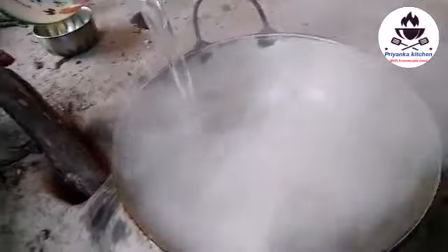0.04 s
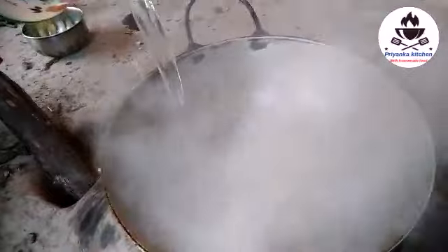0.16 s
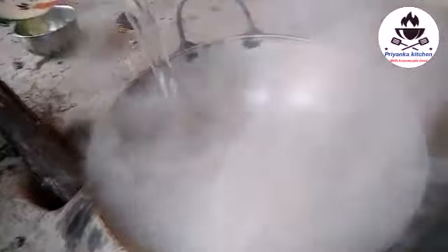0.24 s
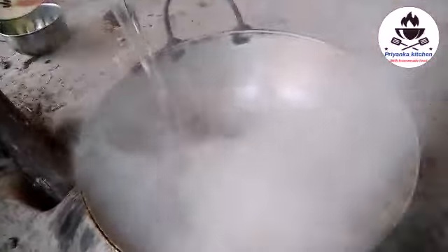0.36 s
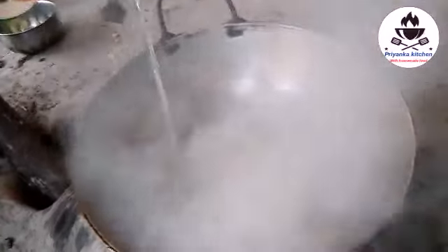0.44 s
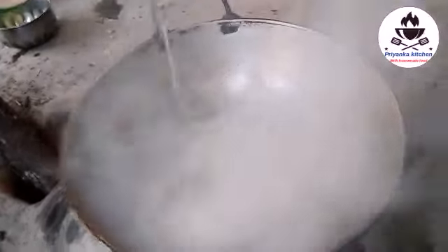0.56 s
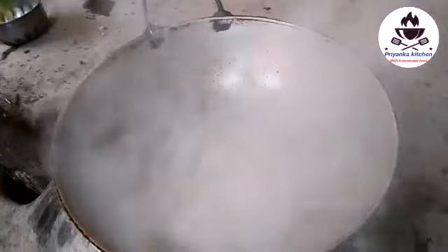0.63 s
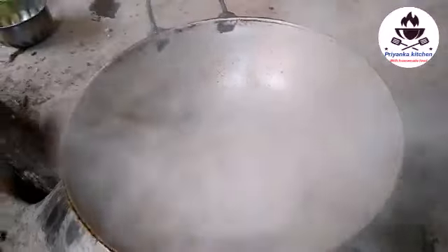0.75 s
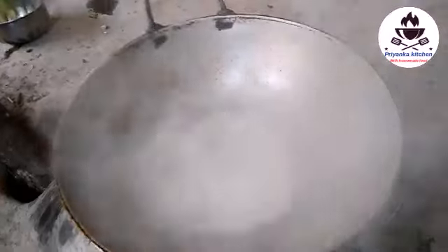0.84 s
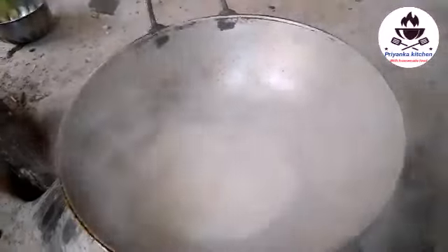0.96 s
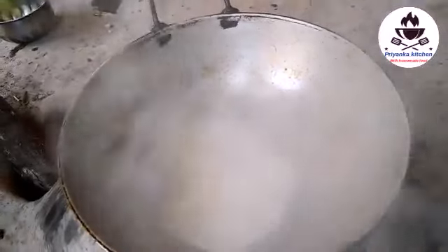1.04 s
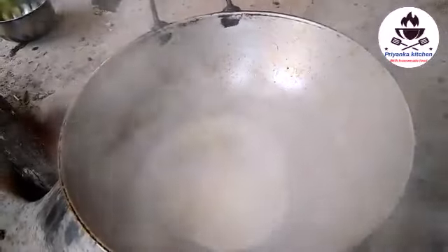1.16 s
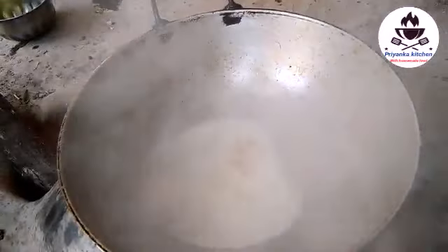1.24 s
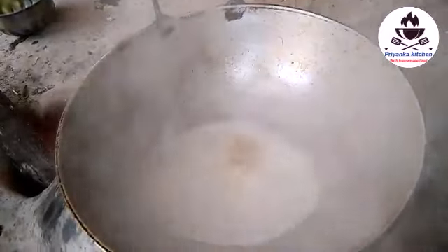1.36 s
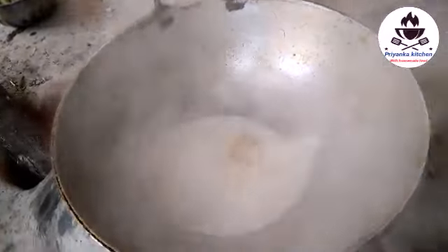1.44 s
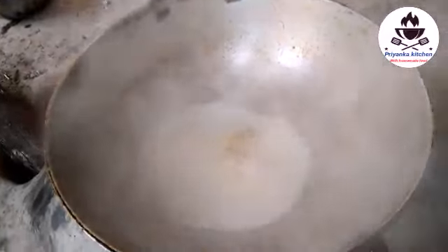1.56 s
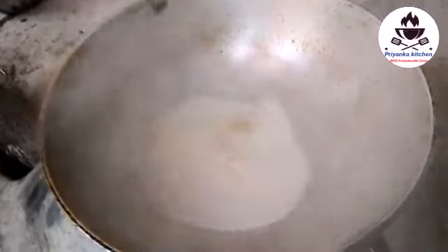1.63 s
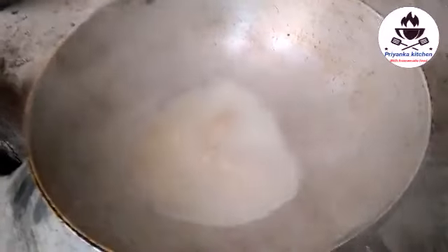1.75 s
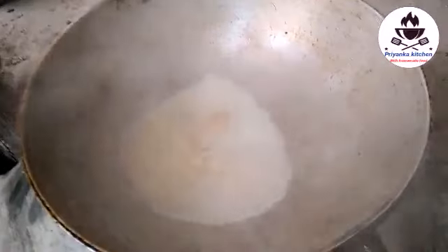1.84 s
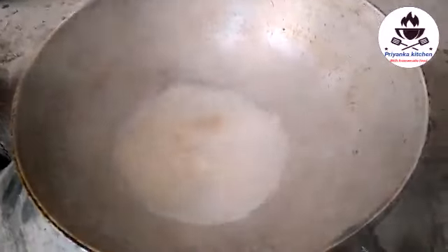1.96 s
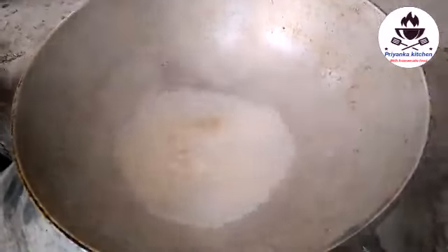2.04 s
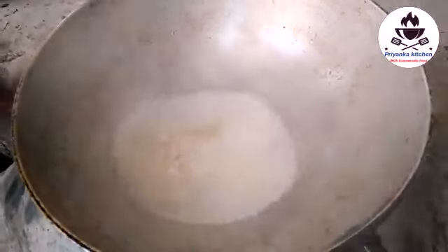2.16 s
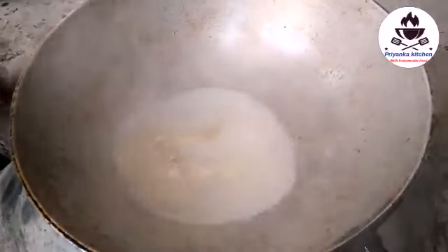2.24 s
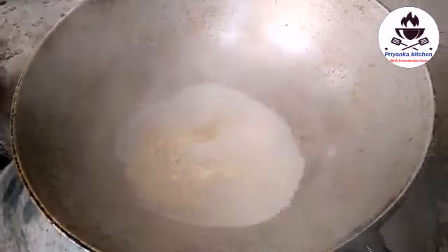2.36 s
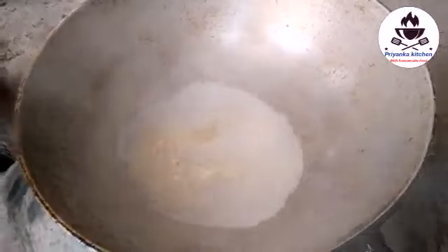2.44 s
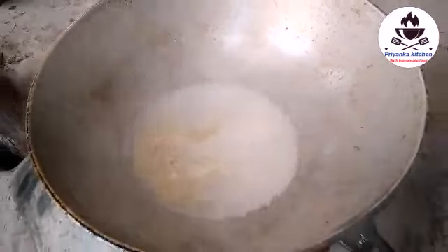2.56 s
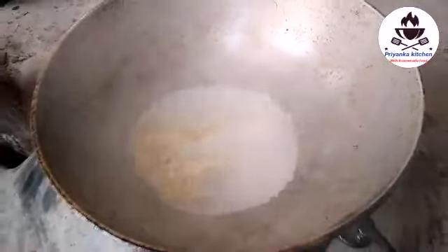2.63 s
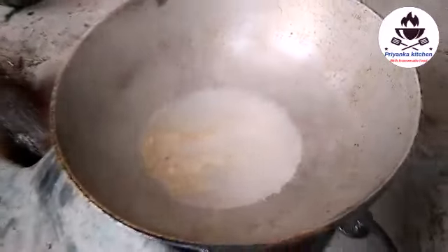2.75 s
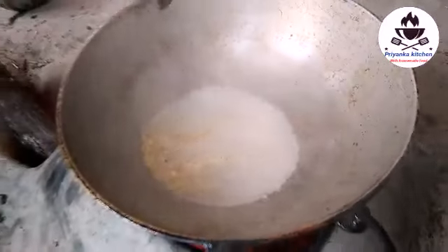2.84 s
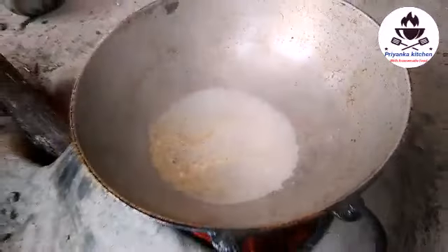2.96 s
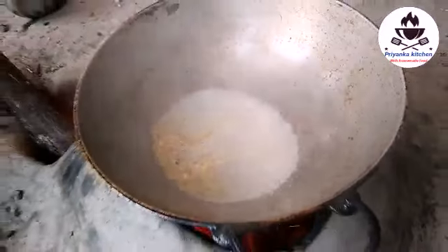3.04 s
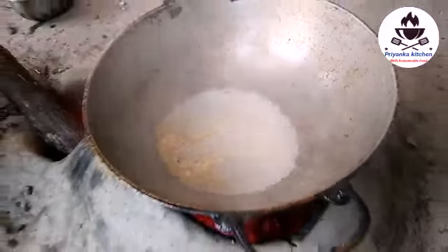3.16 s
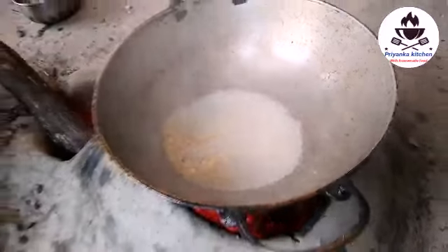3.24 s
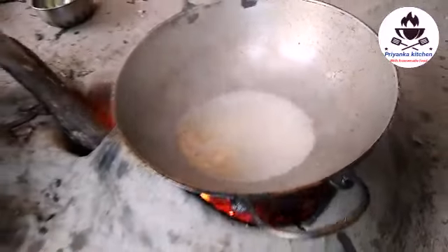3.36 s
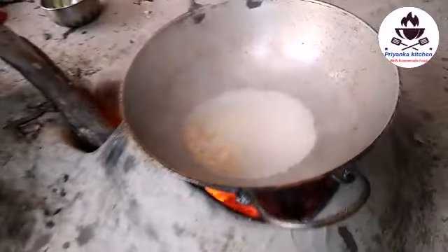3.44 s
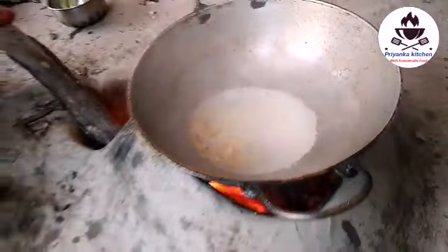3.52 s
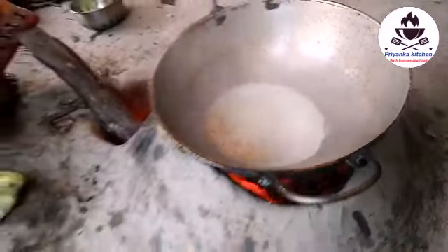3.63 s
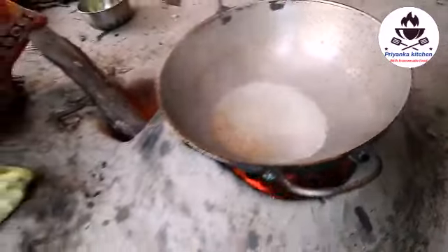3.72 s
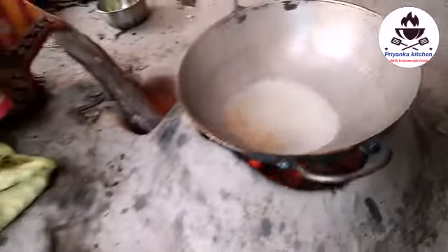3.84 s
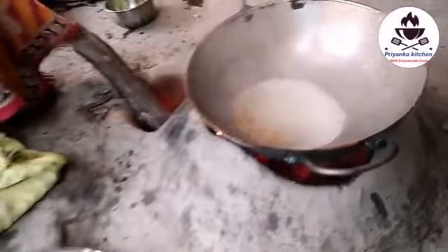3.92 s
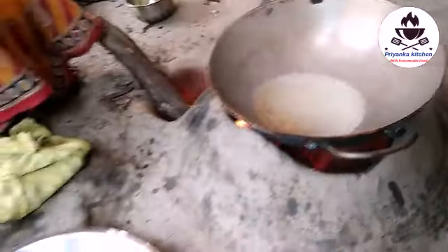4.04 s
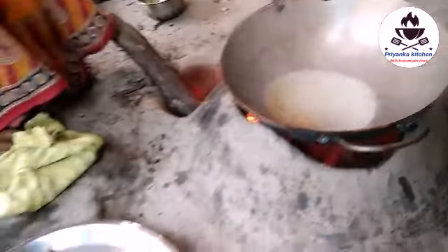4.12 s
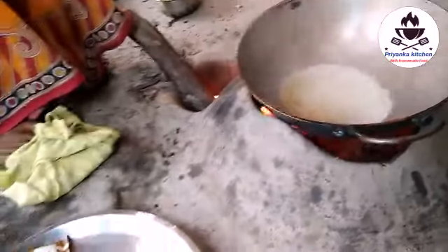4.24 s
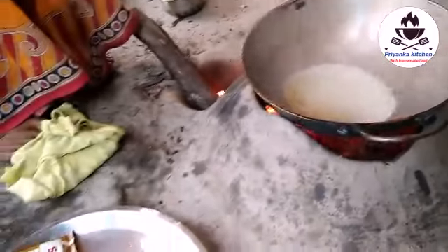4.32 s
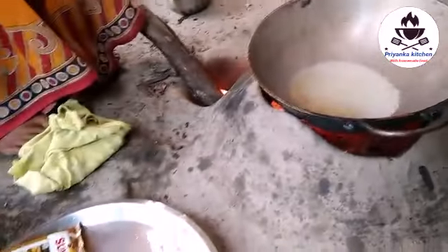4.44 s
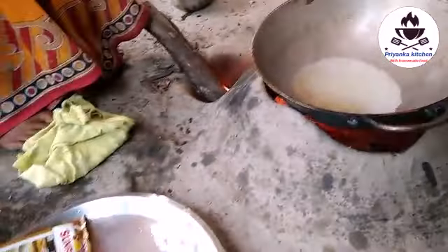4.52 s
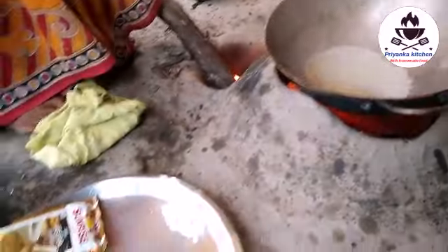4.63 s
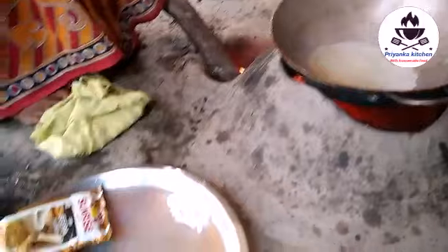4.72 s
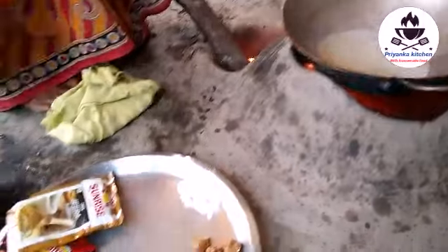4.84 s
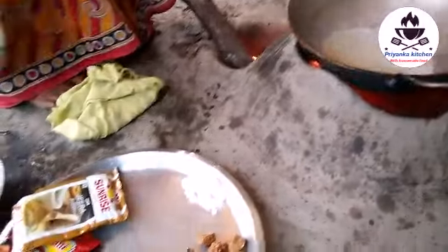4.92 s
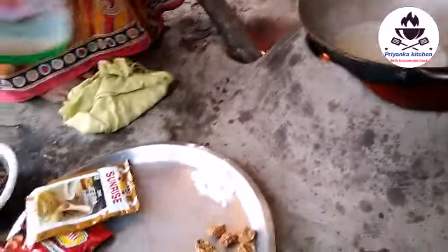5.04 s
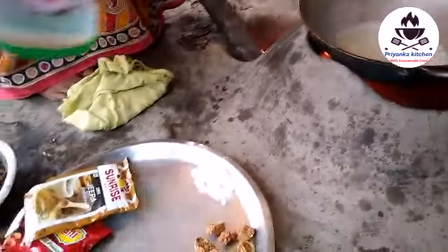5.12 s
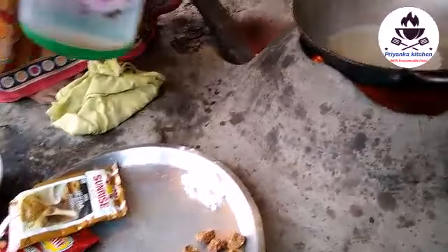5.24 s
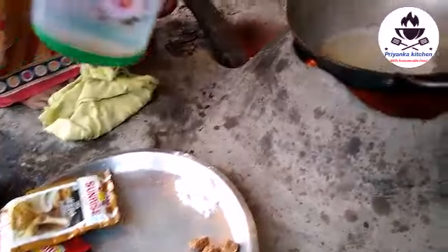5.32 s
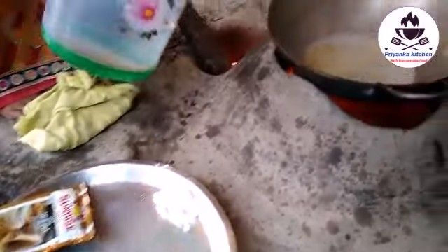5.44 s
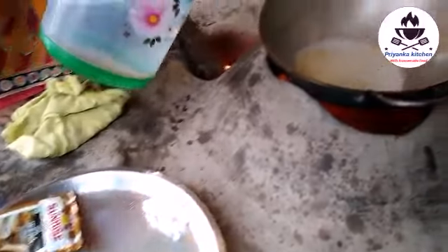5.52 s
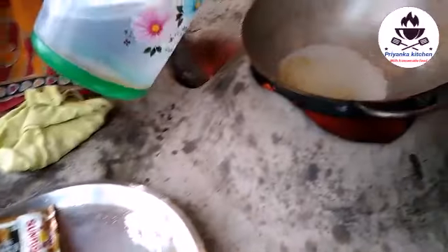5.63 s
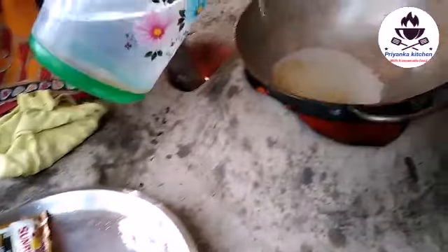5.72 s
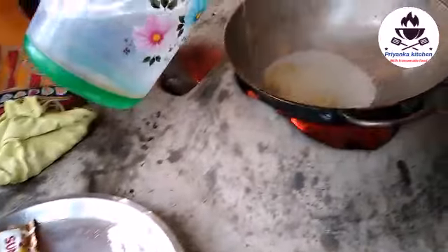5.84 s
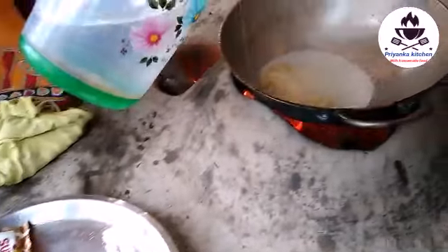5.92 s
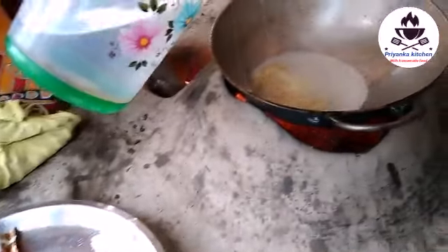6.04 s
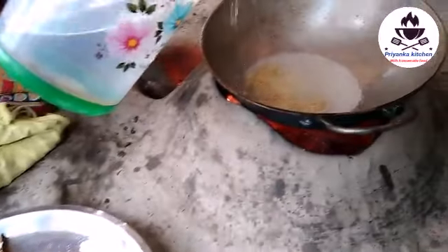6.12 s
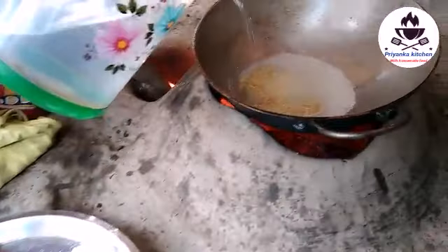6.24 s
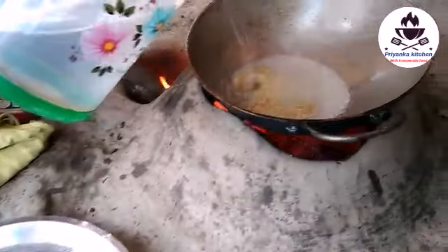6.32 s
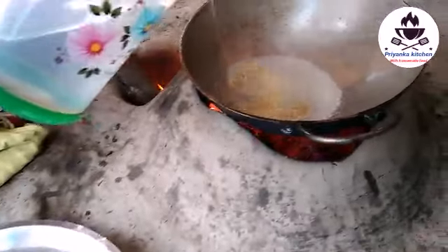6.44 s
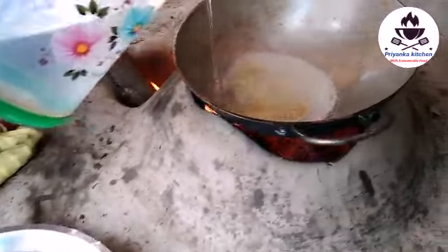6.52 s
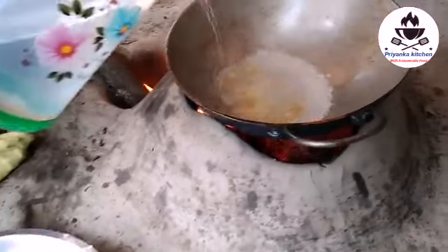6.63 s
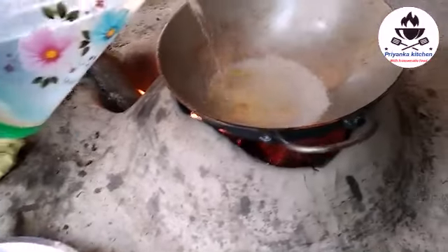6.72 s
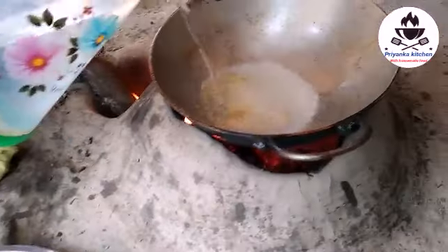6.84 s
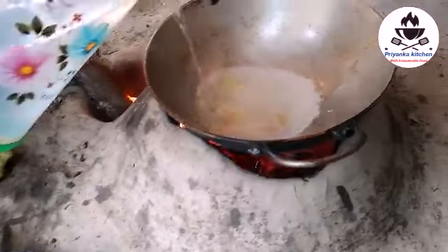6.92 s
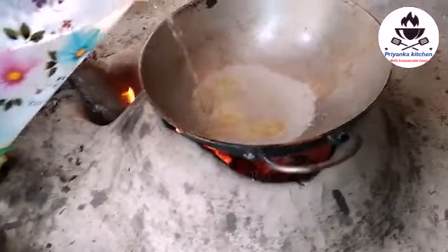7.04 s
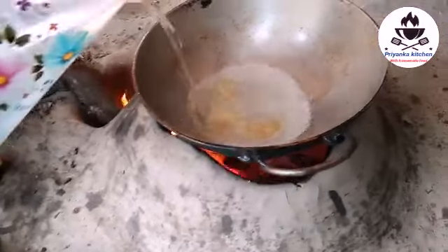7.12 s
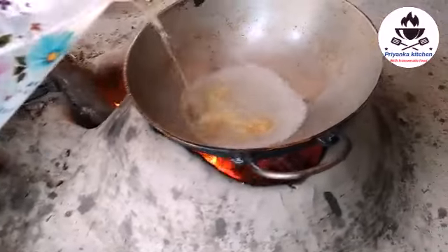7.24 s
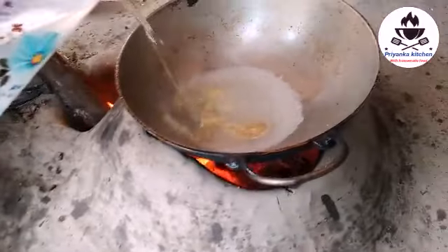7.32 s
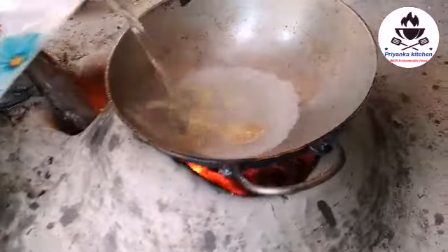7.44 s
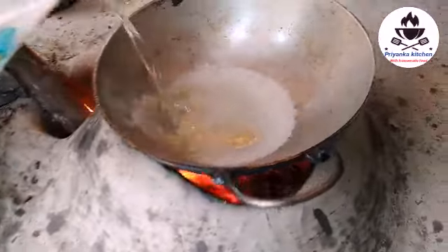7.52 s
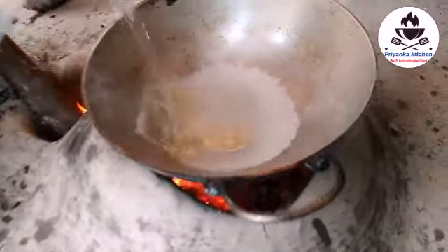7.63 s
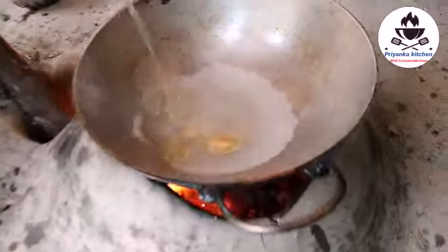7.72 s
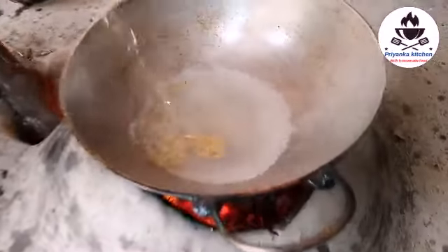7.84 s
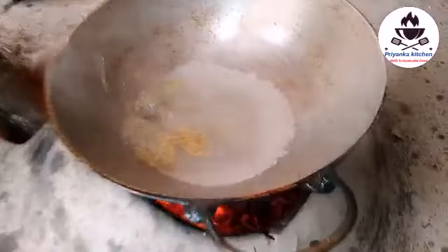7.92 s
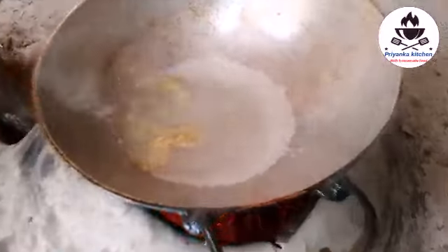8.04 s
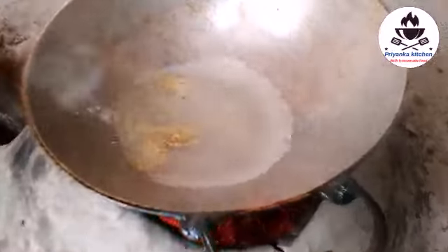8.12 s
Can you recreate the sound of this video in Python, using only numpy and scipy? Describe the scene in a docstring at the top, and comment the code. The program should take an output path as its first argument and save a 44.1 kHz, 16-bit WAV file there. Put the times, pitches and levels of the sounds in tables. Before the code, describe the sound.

Close over a hot oily wok on a wood-fired clay stove, water flashes into a loud, bright steam hiss with frying crackle and sharp oil snaps. The hiss recedes as the hand-held stereo microphone drifts aside, leaving soft boiling, low flutter and small gurgles. Near six seconds a second pour spits in uneven flares and the sizzle swells again.

```python
"""Close over a hot, oily wok on a wood-fired clay stove: the first pour of water flashes into steam at once.
Random bursts over noise make the steam, the frying oil and the boiling bowl; spits of oil snap above them.
A low murmur of throbs soon flutters below, then dull thumps, and decaying tones gurgle once a pool has formed.
The hand-held microphone pair drifts aside and the sound settles; it comes back as a second pour flares up.
A faint rumble lies under it all; the right port loses its bass."""
import sys
import numpy as np
from scipy import signal
from scipy.fft import rfft, irfft, next_fast_len
from scipy.io import wavfile
from scipy.ndimage import uniform_filter1d, map_coordinates

SR = 44100
rng = np.random.default_rng(int(sys.argv[2]) if len(sys.argv) > 2 else 0)


def persist_wave(psi):
    """Save psi, clipped to +-1, as 16-bit WAV."""
    counts = np.round(np.clip(psi, -1, 1) * 32767).astype(np.int16)
    wavfile.write(sys.argv[1], SR, np.atleast_2d(counts).T)


N = 360066  # length in samples


def amp(db):
    """Decibels to gain."""
    return 10 ** (np.asarray(db) / 20)


def unit(x):
    """Scale to rms 1."""
    return x / np.sqrt(np.mean(x ** 2) + 1e-20)


def along(points, hz):
    """Read (f/Hz, value) points on a log frequency axis."""
    f, v = np.transpose(points)
    return np.interp(np.log(hz + 1), np.log(f + 1), v)


def curves(rows):
    """One value per sample for each column after the time."""
    s, *cols = np.transpose(rows)
    return [np.interp(np.arange(N) / SR, s, c) for c in cols]


def wobble(rate):
    """A smooth random curve, rate knots a second."""
    knots = rng.standard_normal(int(N * rate / SR) + 4)
    return map_coordinates(knots, [np.arange(N) * rate / SR])


def filtered(x, response):
    """x times a complex response of frequency."""
    m = next_fast_len(N + SR // 2)
    return irfft(rfft(x, m) * response(np.fft.rfftfreq(m, 1 / SR)), m)[..., :N]


def swept(x, gain_db):
    """Apply a gain that moves: gain_db(column of Hz, sample index of each frame)."""
    hz, at, z = signal.stft(x, SR, nperseg=2048, noverlap=1536)
    frames = np.minimum((at * SR).astype(int), N - 1)
    moved = z * amp(gain_db(hz[:, None], frames))
    return signal.istft(moved, SR, nperseg=2048, noverlap=1536)[1][:, :N]


def bursts(rate, spread_db, share):
    """Two trains of tiny vapour bursts of uneven size, over the blur of those too small to tell apart."""
    pops = (rng.random((2, N)) < rate / SR) * rng.choice([-1, 1], (2, N))
    sizes = amp(spread_db * np.minimum(rng.exponential(size=(2, N)), 4))
    blur = rng.standard_normal((2, N))
    share = np.clip(share, 0, 1)  # the bursts' part of the power
    return np.sqrt(share) * unit(pops * sizes) + np.sqrt(1 - share) * blur


def patchy(x, depth_db, size):
    """Uneven random gains over pitch and time; depth is a number or a curve; size = (bins, frames)."""
    _, at, z = signal.stft(x, nperseg=1024)
    field = uniform_filter1d(rng.standard_normal(z.shape[1:]), size[0], 0)
    field = unit(uniform_filter1d(field, size[1], 1))
    depth = np.interp(at, np.arange(N), depth_db * np.ones(N))
    # the gain can fall far more than it can rise
    gain = amp(depth * (field - 0.95 * field ** 2))
    gain = gain / np.sqrt(np.mean(gain ** 2, axis=0))
    return signal.istft(z * gain, nperseg=1024)[1][:, :N]


# how alike the two microphone ports hear: f/Hz, likeness/0-1
PORT_LIKENESS = [(300, 0.5), (480, 0.65), (680, 0.56), (1200, 0.77), (1800, 0.26), (4000, 0.35),
                 (6000, 0.22), (6900, 0.6), (9000, 0.42), (14000, 0.14)]
# how far the left port lags the right: f/Hz, phase/rad
LEFT_LAG = [(400, .2), (700, .6), (1000, 1.3), (1450, 3.1), (2200, 6.3), (3000, 9.4), (4000, 12.6),
            (4900, 15.7), (5900, 6 * np.pi)]


def at_ports(pair, spectrum, lag=1):
    """Colour two unrelated signals and blend them into a partly alike left and right, with a mid of rms 1."""
    def blend(hz):
        turn = np.arccos(np.clip(along(PORT_LIKENESS, hz), 0, 1)) / 2
        return amp(along(spectrum, hz)) * np.array([np.cos(turn), np.sin(turn)])

    mid, side = filtered(pair, blend)
    ports = np.array([mid + side, mid - side])
    ports = filtered(ports, lambda hz: np.exp(-1j * np.outer([lag, 0], along(LEFT_LAG, hz))))
    return ports / np.std(ports.mean(axis=0))


def panned(x, left_db):
    """Tip a pair towards the left."""
    return np.array([x[0] * amp(left_db / 2), x[1] * amp(-left_db / 2)])


# the microphone's path: t/s, nearness/0-1 (1 above the bowl, 0 far beside it)
MIC_PATH = [(0, 0.98), (2.55, 0.88), (3.5, 0.5), (4.3, 0.19), (5.0, 0.021), (5.9, 0.039), (7.0, 0.26),
            (7.45, 0.28), (8.16, 0.67)]


def nearness():
    """How near the microphone is held to the bowl, sample by sample."""
    return curves(MIC_PATH)[0]


# where the wok lies from the microphone: t/s, left-right level/dB
WOK_BEARING = [(.1, 0), (.8, -1), (2.9, -0.5), (4.0, 0.3), (5.3, 2), (6.9, 1), (7.6, 0), (8.16, -0.5)]
BODY_LEFT_DB = -0.65  # frying and boiling lie a little to the right of the steam


def bearing_db():
    """Left-right level of the wok, sample by sample."""
    return curves(WOK_BEARING)[0]


# colour of the steam: f/Hz, density level/dB per Hz
STEAM_COLOUR = [(3000, -80), (4000, -50), (4950, -13), (5300, -10), (6600, -5), (7800, -1.5), (9000, 2.5),
                (10000, -1), (11200, -3.5), (12500, -3.5), (14300, -8.5)]
HISS_DB, HISS_FAR_LOSS_DB = -16, 10.5  # base level above the bowl; loss far beside it
HISS_BEAM = 1.12  # the treble beams upward: power of the nearness that the steam follows
UNEVEN_NEAR_DB, UNEVEN_FAR_DB = 4.4, 3.0  # depth of the wider random gains


def steam():
    """Steam hiss: dense random bursts over noise, made uneven by random gains in pitch and time."""
    near = nearness()
    far_loss_db = HISS_FAR_LOSS_DB * (1 - np.abs(near) ** HISS_BEAM)
    hiss_db = HISS_DB - far_loss_db + flares()[0] - hiss_dips()
    uneven_db = UNEVEN_FAR_DB + (UNEVEN_NEAR_DB - UNEVEN_FAR_DB) * near
    vapour = patchy(bursts(rate=3700, spread_db=5.5, share=0.069), depth_db=uneven_db, size=(16, 3))
    vapour = patchy(vapour, depth_db=2.4, size=(3, 5))
    return panned(amp(hiss_db) * at_ports(vapour, STEAM_COLOUR), bearing_db())


# colour of the first pour's deeper hiss: f/Hz, density level/dB per Hz
GUSH_COLOUR = [(3500, -80), (5200, -8), (6000, -7), (7700, -4.5), (8800, -7.5), (11000, -46)]
GUSH_DB, GUSH_END_S, GUSH_FADE_S = -27, 1.48, .35


def first_pour():
    """The first pour floods the metal and adds a deeper hiss of bursts, fading out to its end."""
    flooded = np.clip((GUSH_END_S - np.arange(N) / SR) / GUSH_FADE_S, 0, 1)
    gush = at_ports(bursts(rate=1900, spread_db=3, share=0.1), GUSH_COLOUR)
    return panned(amp(GUSH_DB) * flooded * gush, bearing_db())


# colour of the frying oil: f/Hz, density level/dB per Hz
FRYING_COLOUR = [(400, -80), (700, -51), (1400, -9), (1800, -6), (2400, -4.5), (2950, -2.5), (3400, -1),
                 (3900, -1), (4650, 0), (4900, -4.5), (6500, -26)]
FRY_DB, FRY_FAR_LOSS_DB = -22, 12  # base level above the bowl; loss far beside it
DROP_RATE, DROP_DB = 35, -15  # single drops a second at each of two trains; level against the frying


def frying():
    """Droplets fry in the oil as small bursts, with sparse single drops spitting above them."""
    fry_db = FRY_DB - FRY_FAR_LOSS_DB * (1 - nearness()) + flares()[1]
    oil = patchy(bursts(rate=900, spread_db=1.5, share=0.2), depth_db=3.5, size=(3, 6))
    drops = at_ports(bursts(rate=DROP_RATE, spread_db=4.0, share=1.0), FRYING_COLOUR)
    both = at_ports(oil, FRYING_COLOUR) + amp(DROP_DB) * drops
    return panned(amp(fry_db) * both, bearing_db() + BODY_LEFT_DB)


# narrow hollows in the sizzle's colour: f/Hz, half width (to 1/e of the depth)/Hz, depth/dB
SIZZLE_NOTCHES = [(2970, 150, 1.5), (4930, 93, 13.5)]


def notches(hz):
    """Gain of the narrow hollows."""
    return amp(-sum(db * np.exp(-((hz - centre) / width) ** 2) for centre, width, db in SIZZLE_NOTCHES))


def sizzle():
    """Steam, first pour and frying share the same hollows and sputter faintly together."""
    sputter = amp(0.22 * wobble(30) + 0.37 * wobble(150))
    return sputter * filtered(steam() + first_pour() + frying(), notches)


# a hollow in the tone slides as the microphone moves beside the stove: t/s, centre f/Hz, depth/dB
SLIDING_HOLLOW = [(3.0, 784, 1), (3.8, 820, -0.5), (4.6, 870, 5), (5.3, 930, 8), (5.8, 930, 3),
                  (6.0, 780, 7), (6.35, 750, 12), (6.9, 650, 4), (7.55, 606, 7), (8.0, 515, 4)]
HOLLOW_WIDTH_HZ = 59
CREST_ABOVE_HZ, CREST_SHARE = 150, 0.17  # a crest rides above it; its height as a share of the depth
# now and then the low edge lifts and the low end drops out: t/s, half width/s, lift f/Hz
LOW_EDGE_LIFTS = [(.125, 0.084, 208), (.32, 0.048, 170), (2.97, .025, 130), (4.59, 0.038, 150),
                  (4.92, .03, 140), (6.85, 0.075, 190), (7.56, 0.1, 170)]
EDGE_HZ, EDGE_SWING_HZ = 294, 28  # rest pitch and random swing of the low edge
EDGE_RATE, EDGE_DB_PER_HZ = 10, 1  # knots of the swing a second; steepness below the edge


def pool_colour(hz, frames):
    """Gain in dB of the sliding hollow, its crest and the wavering low edge."""
    t = frames / SR
    centre_hz, depth_db = (c[frames] for c in curves(SLIDING_HOLLOW))

    def bell(at_hz):
        return np.exp(-((hz - at_hz) / HOLLOW_WIDTH_HZ) ** 2)

    edge_hz = EDGE_HZ + EDGE_SWING_HZ * wobble(EDGE_RATE)[frames]
    edge_hz = edge_hz + sum(lift * np.exp(-((t - s) / width) ** 2) for s, width, lift in LOW_EDGE_LIFTS)
    hollow_db = depth_db * (CREST_SHARE * bell(centre_hz + CREST_ABOVE_HZ) - bell(centre_hz))
    return hollow_db - EDGE_DB_PER_HZ * np.maximum(edge_hz - hz, 0)


# colour of the boiling heard from above the bowl: f/Hz, density level/dB per Hz
POOL_ABOVE = [(200, -45), (255, -16.5), (315, -1), (410, -4.5), (480, -6.5), (560, -3), (670, 4.5),
              (780, -0.5), (900, -1), (1100, 1.5), (1280, 1.5), (1500, -11.5), (2400, -22)]
# and from beside it: f/Hz, density level/dB per Hz
POOL_BESIDE = [(200, -43), (255, -22), (330, -14), (410, -6), (480, 2), (600, -3.5), (700, -0.5),
               (930, -0.5), (1200, 1), (1400, -2.5), (2400, -21.5)]
BOIL_DB, BOIL_FAR_LOSS_DB = -30, 11.5  # base level above the bowl; loss far beside it
HOLLOW_FROM = 0.16  # nearness from which the bowl starts to sound hollow


def boiling():
    """The pool boils in bursts; the bowl rings hollow from above and sounds flatter from the side."""
    near = nearness()
    boil_db = BOIL_DB - BOIL_FAR_LOSS_DB * (1 - near) + flares()[2]
    above = np.clip((near - HOLLOW_FROM) / (1 - HOLLOW_FROM), 0, 1)
    hollow = patchy(bursts(rate=600, spread_db=3, share=0.29), depth_db=3.0, size=(2, 4))
    hollow = at_ports(hollow, POOL_ABOVE)
    flat = patchy(bursts(rate=600, spread_db=4.5, share=0.39), depth_db=2.5, size=(2, 4))
    # from the side the two ports are more nearly the same distance away
    flat = at_ports(flat, POOL_BESIDE, lag=0.78)
    pool = np.sqrt(above) * hollow + np.sqrt(1 - above) * flat
    return panned(amp(boil_db) * swept(pool, pool_colour), bearing_db() + BODY_LEFT_DB)


# colour of the faint rumble: f/Hz, density level/dB per Hz
RUMBLE_COLOUR = [(20, -23), (70, -19), (130, 3), (300, -30), (600, -60)]
FLOOR_DB = -95  # rms before the microphone


def floor():
    """A very faint rumble of filtered noise lies under everything."""
    noise = rng.standard_normal((2, N))
    return amp(FLOOR_DB) * unit(filtered(noise, lambda hz: amp(along(RUMBLE_COLOUR, hz))))


# water runs onto dry hot metal and flares:
# start t/s, length/s, rise of the steam level/dB, of the frying level/dB, of the boiling level/dB
WATER_FLARES = [(0.185, 0.065, 2.8, 1.5, 0.5), (1.0, 0.14, 0, 1.5, 0), (1.85, 0.27, 0.9, 0.7, 1.5),
                (6.115, 0.3, 1.2, 0.8, -0.5), (6.61, 0.082, 4, 6.5, 2), (6.725, 0.06, 4.3, 2, 2.5),
                (6.812, 0.089, 3.5, 1, -1), (7.083, 0.23, 2.5, 2.5, 0.5), (7.198, 0.041, 1, 1.5, 3.5),
                (7.398, 0.074, 2.5, 0, -0.5), (7.521, 0.17, 6.5, 4.8, 2), (7.73, 0.1, 5, 3.8, 2),
                (7.973, 0.061, 2, 0, 0), (8.133, .1, 4.5, -1.5, 1)]
FLARE_ATTACK_S, FLARE_RELEASE_S = 0.026, 0.092


def flares():
    """Rise in dB of the steam, frying and boiling: each flare swells, holds while water runs, and boils off."""
    t = np.arange(N) / SR
    rise_db = np.zeros((3, N))
    for start, length, *layer_db in WATER_FLARES:
        attack = np.clip((t - start) / FLARE_ATTACK_S, 0, 1)
        release = np.clip(1 - (t - start - length) / FLARE_RELEASE_S, 0, 1)
        rise_db += np.outer(layer_db, attack * release)
    return rise_db


# the sharpest spits of oil: t/s, peak level before the microphone/dB
OIL_SPITS = [(.245, -5), (1.217, -9), (1.501, -9), (1.604, -9), (2.123, -9), (2.397, -9), (2.985, -10),
             (4.979, -18), (6.299, -14), (6.928, -15), (7.372, -14), (7.555, -9)]
SPIT_HZ, SPIT_LIFE_S = 8800, .0003  # middle pitch, scattered a quarter octave either way; decay scale


def spits():
    """Single drops burst in the oil with a snap of a few cycles."""
    out, t = np.zeros(N + SR), np.arange(SR // 100) / SR
    for (s, db), octaves in zip(OIL_SPITS, rng.uniform(-.25, .25, len(OIL_SPITS))):
        ring = np.sin(2 * np.pi * SPIT_HZ * 2 ** octaves * t)
        snap = np.diff(ring * t * np.exp(-2 * t / SPIT_LIFE_S))
        out[round(s * SR):][:len(snap)] += amp(db) * snap / np.abs(snap).max()
    return out[:N]


# the murmur comes in runs with no throbs placed between: start t/s, end t/s
RUNS = [(.45, .50), (.57, .61), (.66, .89), (.96, 1.03), (1.2, 1.26), (1.64, 1.84), (1.89, 2.28),
        (2.41, 2.54), (2.66, 2.79), (3.02, 3.67), (3.78, 4.09), (4.15, 4.89), (4.96, 6.06), (6.13, 6.99),
        (7.1, 7.22), (7.33, 7.5), (7.68, 8.16)]
# colour of the soft rumble that joins the throbs of a run: f/Hz, density level/dB per Hz
BED_COLOUR = [(50, -50), (100, -20), (160, 0), (210, -1), (250, -10), (320, -40)]
BED_DB, BED_EDGE_S = -10, .025  # level against the throbs; rise and fall
MURMUR_DB, MURMUR_FAR_LOSS_DB = -48, 5.5  # level above the bowl; loss far beside it
THROB_LOW_HZ, THROB_SPAN_HZ = 138.3, 67
THROB_S, THROB_SPREAD_DB = 0.012, 7  # middle half width; spread of level
THROB_RATE, THROB_SCATTER = 22, 0.9  # throbs a second within a run; scatter as a share of their spacing


def murmur():
    """A low murmur flutters in runs of short uneven throbs over soft noise, weaker away from the wok."""
    out, t = np.zeros(N + SR), np.arange(-SR // 10, SR // 10) / SR
    for start, end in RUNS:
        count = max(1, round((end - start) * THROB_RATE))
        draws = rng.random(size=(40, 5))[:count]
        for k, (shift, pitch, strength, length, phase) in enumerate(draws):
            s = start + (end - start) * (k + .5 + THROB_SCATTER * (shift - .5)) / count
            s = np.clip(s, start + 2 * THROB_S, end - 2 * THROB_S)
            swell = np.exp(-(t / (THROB_S * (.5 + length))) ** 2)
            tone = np.sin(2 * np.pi * ((THROB_LOW_HZ + THROB_SPAN_HZ * pitch) * t + phase))
            out[round((s + t[0]) * SR):][:len(t)] += amp(-THROB_SPREAD_DB * strength) * swell * tone
    now = np.arange(N) / SR
    gate = sum(np.clip(np.minimum(now - start, end - now) / BED_EDGE_S, 0, 1) for start, end in RUNS)
    bed = gate * filtered(rng.standard_normal(N), lambda hz: amp(along(BED_COLOUR, hz)))
    level_db = MURMUR_DB - MURMUR_FAR_LOSS_DB * (1 - nearness())
    return amp(level_db) * unit(unit(out[:N]) + amp(BED_DB) * unit(bed))


# soft low thumps: peak t/s, swell level before the microphone/dB, pitch f/Hz
LOW_THUMPS = [(1.339, -45, 135), (1.499, -43, 137), (2.099, -49, 100), (2.921, -41, 123), (4.299, -48, 98),
              (4.779, -51, 90), (5.089, -48, 95), (6.648, -41, 163), (7.385, -49, 90), (7.436, -45, 105),
              (7.865, -42, 115), (8.07, -39, 180)]
THUMP_RISE_S = 0.0119


def thumps():
    """Dull puffs: low tones of a few cycles that swell and die away."""
    out, t = np.zeros(N + SR), np.arange(SR // 5) / SR
    swell = t / THUMP_RISE_S * np.exp(1 - t / THUMP_RISE_S)
    for s, db, hz in LOW_THUMPS:
        puff = swell * np.sin(2 * np.pi * (hz * t + rng.random()))
        out[round((s - THUMP_RISE_S) * SR):][:len(t)] += amp(db) * puff
    return out[:N]


# brief dips in the hiss level: t/s, depth/dB
HISS_DIPS = [(1.68, 3), (2.93, 2.5)]
DIP_S = 0.043  # half width


def hiss_dips():
    """The dB by which the hiss level dips briefly."""
    t = np.arange(N) / SR
    return sum(db * np.exp(-((t - s) / DIP_S) ** 2) for s, db in HISS_DIPS)


# single gulps of the pool placed by hand: peak t/s, swell level before the microphone/dB, starting pitch f/Hz
POOL_GULPS = [(3.208, -41, 270), (3.327, -37, 340), (7.812, -37, 327), (7.864, -41, 293), (8.07, -39, 280)]
BUBBLES_START_S, BUBBLE_LIFE_S = 2.4, 0.00882  # earliest peak; rise and decay scale
BUBBLE_LOW_HZ, BUBBLE_SPAN_HZ = 259, 165
BUBBLE_GLIDE_PER_S = .5  # upward glide as a share of the pitch
BUBBLE_DB, BUBBLE_SPREAD_DB, BUBBLE_FAR_LOSS_DB = -35, 6, 9  # strongest above the bowl; spread; far loss


def bubbles():
    """Once a pool has formed, larger bubbles gurgle in it, each rising a little in pitch as it dies."""
    out, t = np.zeros(N + SR), np.arange(SR // 8) / SR
    when, size, strength = rng.random(size=(135, 3)).T
    times = BUBBLES_START_S + when * (N / SR - BUBBLES_START_S)
    far_loss_db = BUBBLE_FAR_LOSS_DB * (1 - nearness()[(times * SR).astype(int)])
    levels = BUBBLE_DB - BUBBLE_SPREAD_DB * strength - far_loss_db
    pitches = BUBBLE_LOW_HZ + BUBBLE_SPAN_HZ * size
    swell = t / BUBBLE_LIFE_S * np.exp(1 - t / BUBBLE_LIFE_S)
    for s, db, hz in [*POOL_GULPS, *zip(times, levels, pitches)]:
        ring = swell * np.sin(2 * np.pi * hz * (t + BUBBLE_GLIDE_PER_S * t * t / 2))
        out[round((s - BUBBLE_LIFE_S) * SR):][:len(t)] += amp(db) * ring
    return out[:N]


def scene():
    """The sizzling wok and the low sounds beneath it."""
    return sizzle() + boiling() + floor() + spits() + murmur() + thumps() + bubbles()


# the microphone ports differ in colour: f/Hz, left-right level/dB
PORT_COLOUR = [(480, 5), (650, 0.5), (1100, 0), (1700, 0.5), (4000, 2), (6000, 0), (8000, 0.5), (10000, 4),
               (14000, 3)]
CLIP_LEVEL, CLIP_HARDNESS = .97, 24  # ceiling of the peaks; sharpness of the bend
TOP_HZ = 14300  # band limit


def record(dry):
    """The ports differ in colour, the right loses its bass; tall peaks are rounded, the top is cut off."""
    bass_cut = [(250, -38), (350, -38), (400, -46), (445, 5.5), (480, 1.0)]  # f/Hz, level/dB
    left = filtered(dry[0], lambda hz: amp(along(PORT_COLOUR, hz) / 2))
    right = filtered(dry[1], lambda hz: amp(along(bass_cut, hz) - along(PORT_COLOUR, hz) / 2))
    pair = np.array([left, right])
    rounded = pair / (1 + np.abs(pair / CLIP_LEVEL) ** CLIP_HARDNESS) ** (1 / CLIP_HARDNESS)
    return filtered(rounded, lambda hz: hz < TOP_HZ)


dry = scene()
out = record(dry)
persist_wave(out)
```